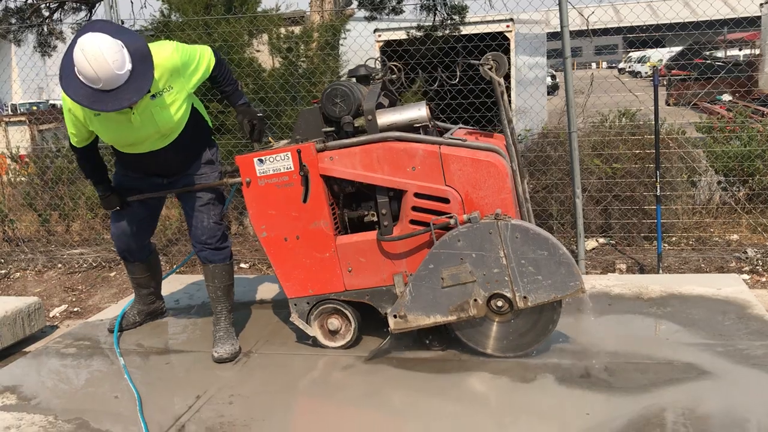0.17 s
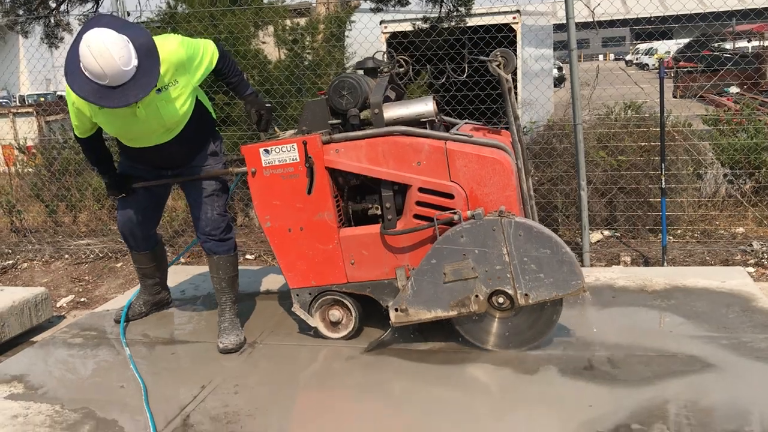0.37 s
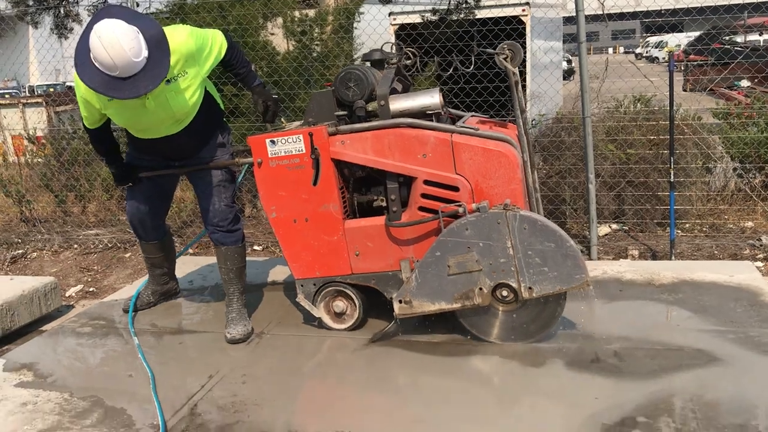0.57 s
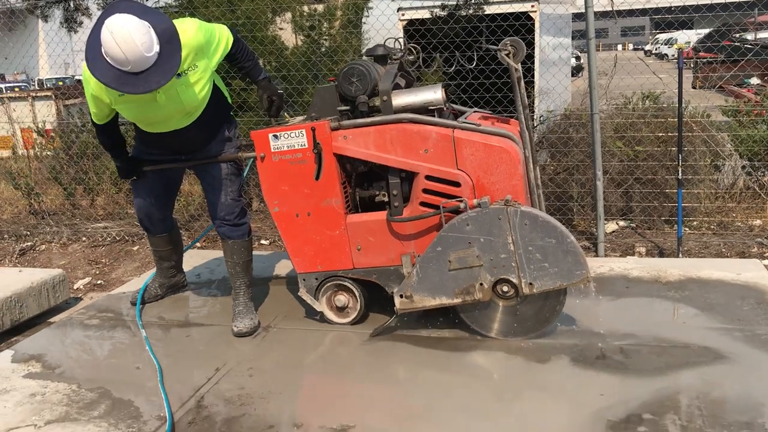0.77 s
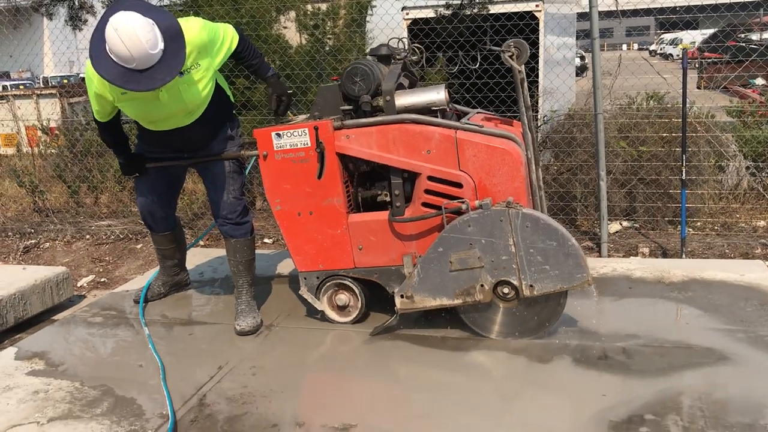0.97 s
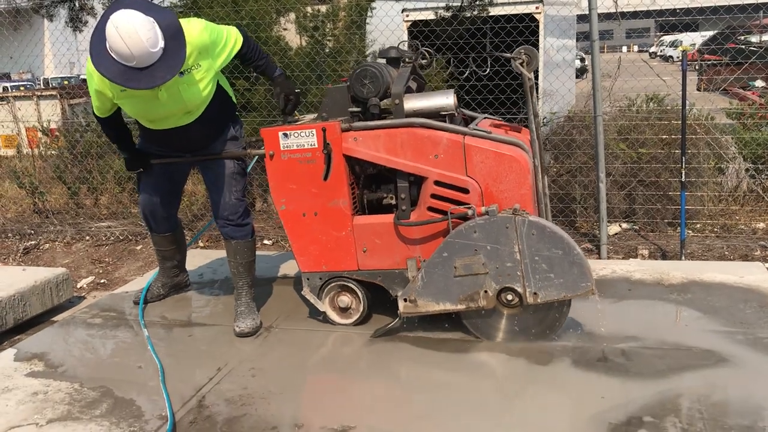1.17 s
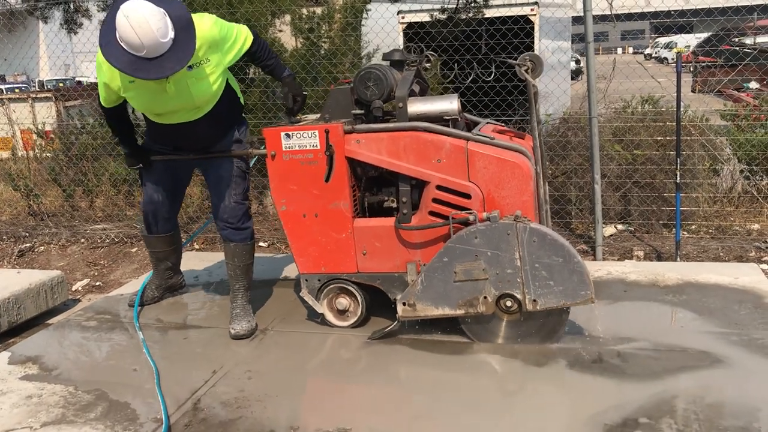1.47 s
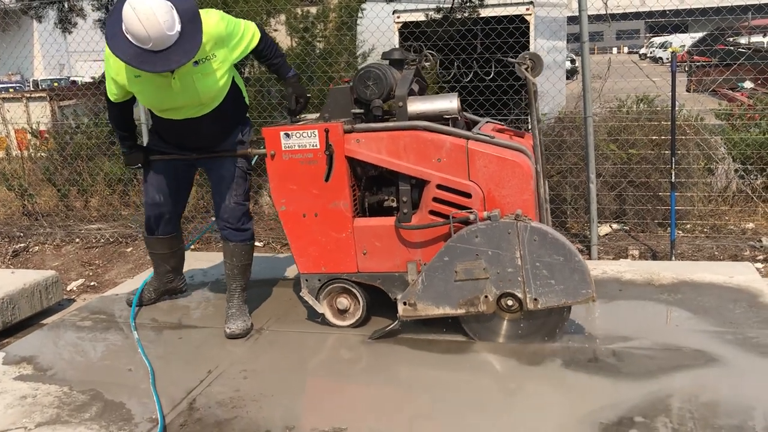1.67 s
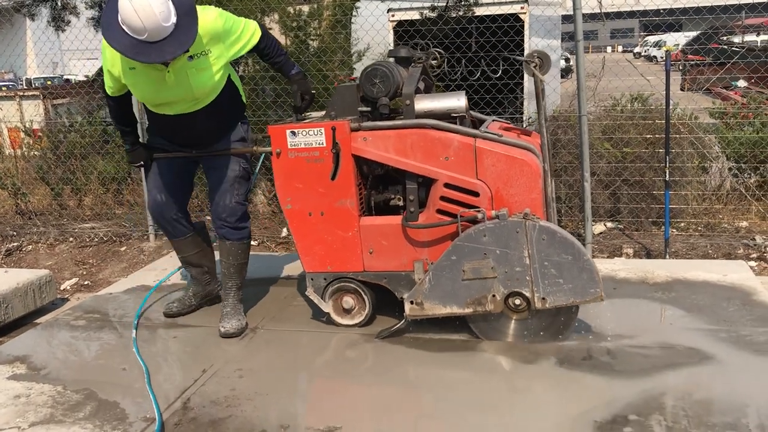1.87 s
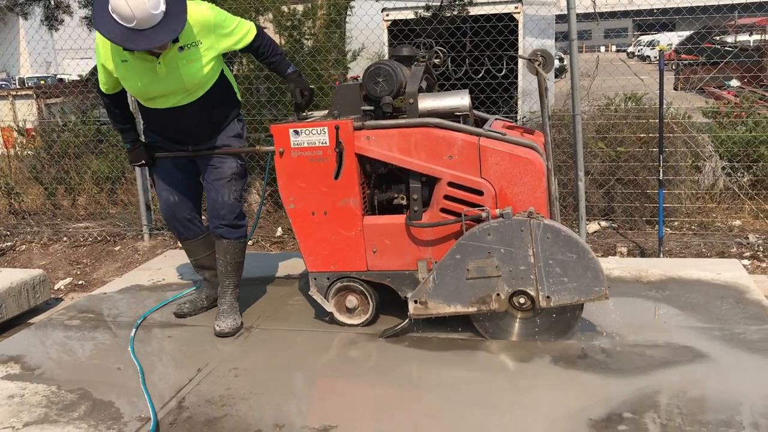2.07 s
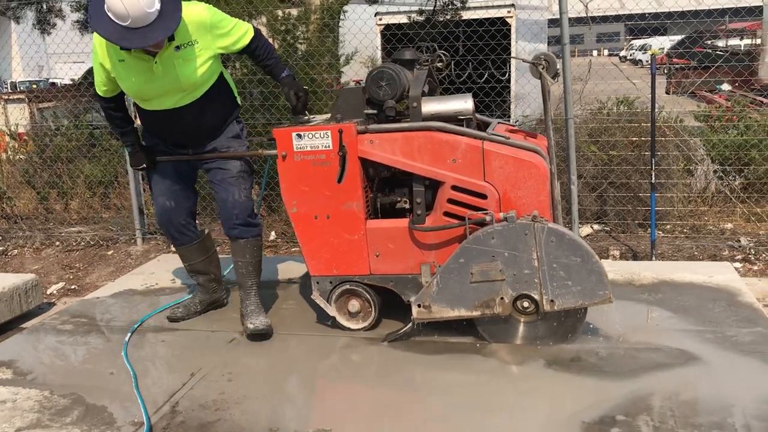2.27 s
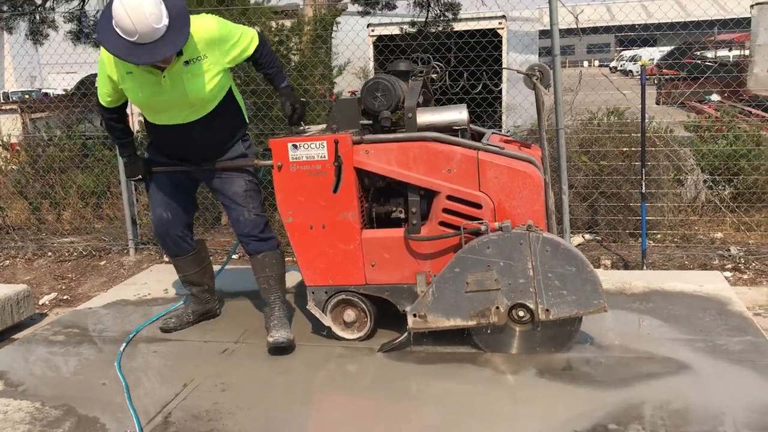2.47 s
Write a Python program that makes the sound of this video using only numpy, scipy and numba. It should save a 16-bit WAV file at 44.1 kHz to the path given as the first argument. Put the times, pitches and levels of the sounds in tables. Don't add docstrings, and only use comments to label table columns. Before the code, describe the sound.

A diesel walk-behind concrete saw, close and outdoors: after a tiny stutter the engine drones at steady revs, then at half a second the steel blade bites, adding a dense, bright, ringing grind to the end.

```python
import sys
import numpy as np
from scipy import signal
from scipy.fft import rfft, irfft, next_fast_len
from scipy.io import wavfile
from scipy.ndimage import uniform_filter1d
from numba import njit

SR = 44100
rng = np.random.default_rng(int(sys.argv[2]) if len(sys.argv) > 2 else 0)


def to_linear_factor(level_db):
    exponent = np.asarray(level_db, float) / 20
    return 10 ** exponent


def generate_wav(sig):
    pcm = np.round(np.clip(np.atleast_2d(sig).T, -1, 1) * 32767).astype(np.int16)
    wavfile.write(sys.argv[1], SR, pcm)


N = 115983
BITE_S = 0.4996


def level(x, db):
    return x * to_linear_factor(db) / np.sqrt(np.mean(x ** 2))


def noise():
    return rng.standard_normal(N)


@njit
def svf(x, hz, width):
    y, band, low = np.empty(len(x)), 0., 0.
    g, damping = np.tan(np.pi * hz / SR), width / hz
    for i in range(len(x)):
        v = (band + g * (x[i] - low)) / (1 + g * (g + damping))
        band, low, y[i] = 2 * v - band, low + 2 * g * v, damping * v
    return y


def resonance(x, hz, width, skirt_width):
    return svf(svf(x, float(hz), float(width)), float(hz), float(skirt_width))


def walk(rate):
    hold = int(SR / rate)
    steps = np.repeat(rng.standard_normal(N // hold + 1), hold)
    return 1.73 * uniform_filter1d(uniform_filter1d(steps, hold), hold)[:N]


def colour(x, table, flicker_db):
    hz, db = np.array(table).T
    f = np.maximum(np.fft.rfftfreq(N, 1 / SR), 1)
    spectrum = rfft(x) * to_linear_factor(np.interp(np.log(f), np.log(hz), db))
    third = 3 * np.log2(f / 30)
    total = 0
    for k in range(-2, 30):
        band = irfft(spectrum * np.clip(1 - abs(third - k), 0, 1), N)
        total = total + band * to_linear_factor(flicker_db * walk(9))
    return level(total, 0)


def ring(x, modes, swell_db):
    total = 0
    for hz, width, db in modes:
        mode = level(resonance(x, hz, width, 3 * width), 0)
        total = total + to_linear_factor(db + swell_db * walk(5)) * mode * np.sqrt(width)
    return level(total, 0)


def engine():
    # multiple of the four-stroke cycle, level in dB.
    exhaust = [(1, -39), (2, -33), (3, -29), (4, -5), (5, -24), (6, -17), (7, -26), (8, 0), (9, -20),
               (10, -17), (11, -17), (12, -20), (13, -23), (14, -20), (15, -21), (16, -28), (17, -28),
               (18, -25), (19, -29), (20, -23), (21, -25), (22, -23), (23, -19), (24, -24), (25, -29),
               (26, -23), (27, -25), (28, -22)]
    # frequency in Hz, width in Hz, level in dB.
    housing = [(330, 200, -7), (411, 8, 0), (590, 160, -9), (621, 8, -1), (823, 8, -1), (918, 8, -3),
               (1080, 8, -3), (1324, 12, -1), (1390, 90, -9), (2072, 16, -3), (2390, 90, -9),
               (3310, 200, -18)]
    # frequency in Hz, level in dB per Hz.
    roar = [(30, -22), (70, -32.5), (150, -19), (300, -19.5), (450, -26), (900, -19.5), (2500, -19.5),
            (16000, -49)]
    cycle_hz, knock_depth = 27.0, 0.15
    turn = 2 * np.pi * np.cumsum(cycle_hz * (1 + .0008 * walk(3))) / SR
    lines = 0
    for k, db in exhaust:
        waver_db = .6 if k % 4 == 0 else 3
        phase = 2 * np.pi * rng.random()
        lines = lines + to_linear_factor(db + waver_db * walk(6.15)) * np.sin(k * turn + phase)
    gas = noise() * (1 + knock_depth * np.cos(4 * turn))
    late_gas = np.roll(gas, 1024)
    return (level(lines, 1.5) + to_linear_factor(-5) * colour(gas, roar, flicker_db=-0.65)
            + to_linear_factor(-8) * ring(late_gas, housing, swell_db=1.2))


def blade():
    # frequency in Hz, width in Hz.
    disc = [(2579, 55), (3078, 50), (3365, 55), (3715, 120), (3832, 50), (4110, 90), (4435, 90), (4787, 38),
            (5255, 110), (5610, 60), (5992, 40), (6285, 90), (6575, 50), (6980, 50)]
    disc_mode_db = [-3, -3, -0.5, -1.5, -3.5, -4.5, -3, -0.5, -5.5, -3.5, -1, -6.5, -1, -10.5]
    # frequency in Hz, width in Hz, level in dB.
    rim = [(8510, 50, -2), (8950, 70, 0), (9280, 110, -1), (10750, 120, -3), (11100, 200, 0),
           (11600, 90, -1), (12800, 80, -5), (13200, 80, -5), (14800, 150, -2), (15400, 120, -2)]
    # frequency in Hz, level in dB per Hz.
    grind = [(1500, -14.5), (2850, -7.5), (3300, 1), (4300, 2.5), (5000, -2), (6700, -4), (7700, -8.5),
             (16000, -8.5)]
    shaft_hz, runout_db, grit_db = 29.3, 0.5, -1.5
    t = np.arange(N) / SR
    grain = uniform_filter1d(noise(), size=8) * np.sqrt(8)
    runout = np.sin(2 * np.pi * shaft_hz * t)
    bite = to_linear_factor(grit_db * grain + runout_db * runout + 0.65 * walk(30.48))
    hiss_grit, ring_grit = rng.standard_normal((2, N)) * bite
    disc_modes = [(hz, width, db) for (hz, width), db in zip(disc, disc_mode_db)]
    hiss = to_linear_factor(-6.5) * colour(hiss_grit, grind, flicker_db=0.3)
    body = to_linear_factor(-8.5) * ring(ring_grit, disc_modes, swell_db=1.2)
    edge = to_linear_factor(-17) * ring(ring_grit, rim, swell_db=-1.0)
    return level(hiss + body + edge, 0)


def singing(t):
    # frequency in Hz, width in
    # Hz, steadiness from 0 to 1.
    singers = [(1032, 14, .6), (2105, 75, .15), (7229, 20, .5)]
    # time in seconds, then the level of each singing tone in dB.
    flexing = [(0.5, -30, -23, -23), (0.53, -28.5, -17.5, -30), (0.58, -24, -29, -30),
               (0.62, -26, -22.5, -34), (0.77, -29, -29.5, -24), (0.79, -45, -27, -36),
               (0.81, -33, -29.5, -27), (0.99, -29, -24.5, -28.5), (1.5, -39.5, -31, -33),
               (1.56, -40, -23.5, -30), (1.6, -47, -27, -34), (1.63, -37, -36, -43), (1.69, -42, -27, -46),
               (1.77, -39, -26, -31), (2.03, -35.5, -32, -37), (2.35, -46, -34, -62), (2.54, -30, -30, -40),
               (2.62, -36, -37, -44)]
    flex, total = np.array(flexing).T, 0
    for (hz, width, steady), db in zip(singers, flex[1:]):
        tone = level(resonance(noise(), hz, width, 3 * width), 0)
        envelope = abs(signal.hilbert(tone, next_fast_len(N))[:N])
        held = tone / (envelope + .1) ** steady
        total = total + level(held, 0) * to_linear_factor(np.interp(t, flex[0], db))
    return total


def spray(t):
    rise_db_s = 9
    wet = level(svf(noise(), 7300.0, 13000.0), -29.5)
    return wet * to_linear_factor(rise_db_s * np.minimum(t - BITE_S, 0))


def whir(t):
    hz, width_hz, fade_db_s = 1335, 110, -20
    air = resonance(noise(), hz, width_hz, 2 * width_hz)
    return level(air, -31.5) * to_linear_factor(fade_db_s * t)


def breeze(t):
    fade_db_s = -9
    gust = level(resonance(noise(), 45, 50, 50), -41)
    return gust * to_linear_factor(fade_db_s * t + 3 * walk(5))


def fills(t):
    # centre in seconds, low edge in Hz, high edge in Hz, level in dB.
    patches = [(.998, 4150, 5150, -27), (1.533, 12450, 13850, -36), (1.951, 4250, 5650, -32),
               (1.951, 9650, 10950, -37), (2.555, 5250, 6850, -29), (2.555, 7650, 10950, -35)]
    side = 0
    for centre_s, low_hz, high_hz, db in patches:
        band = signal.butter(6, [low_hz, high_hz], "band", fs=SR, output="sos")
        patch = level(signal.sosfilt(band, noise()), db)
        side = side + patch * np.clip((.016 - abs(t - centre_s)) / .008, 0, 1)
    return side * np.array([[1], [-1]])


def scene():
    # time in seconds, recorder gain in dB.
    gain = [(0.1, -18.5), (0.48, -19.5), (0.53, -20.5), (0.92, -20.5), (1.23, -23.5), (2.6, -27.5),
            (2.62, -28.5)]
    # time in seconds, pressure in dB.
    pressure = [(0.53, -14.5), (0.83, -16.5), (0.95, -18), (1.06, -15), (1.4, -16.5), (1.41, -18.5),
                (1.5, -14.5), (1.65, -17.5), (2.15, -17.5), (2.2, -20.5), (2.42, -18.5), (2.62, -20.5)]
    bite_rise_s = 0.021
    t = np.arange(N) / SR
    gain_db = np.interp(t, *np.array(gain).T)
    press_db = np.interp(t, *np.array(pressure).T) + 2.07
    bite = 1 / (1 + np.exp(-(t - BITE_S) / bite_rise_s * 2))
    mono = engine() * to_linear_factor(gain_db) + spray(t) * (1 - bite) + breeze(t) + whir(t)
    mono = mono + bite * (blade() * to_linear_factor(press_db) + singing(t))
    return np.array([mono, mono])


def band_limit(x):
    return signal.sosfilt(signal.butter(12, 16640, fs=SR, output="sos"), x)


def record(dry):
    softness, low_cut_hz, top_hz = 1.25, 56, 15720
    scrap_s, scrap_len_s, scrap_fade_s, open_s = .0608, .0124, .002, .0003
    stall = 1024
    x = np.tanh(softness * dry) / softness
    x = signal.sosfilt(signal.butter(2, low_cut_hz, "high", fs=SR, output="sos"), x)
    x = signal.sosfilt(signal.ellip(12, .3, 70, top_hz, fs=SR, output="sos"), x)
    t = np.arange(N) / SR
    since = t - scrap_s
    scrap_gate = np.clip(since / open_s, 0, 1) * np.clip((scrap_len_s - since) / scrap_fade_s, 0, 1)
    scrap = np.roll(x, -stall, axis=1) * scrap_gate
    onward = x * np.clip((since - stall / SR) / open_s, 0, 1)
    return band_limit(scrap + onward + fills(t))


dry = scene()
out = record(dry)
generate_wav(out)
```